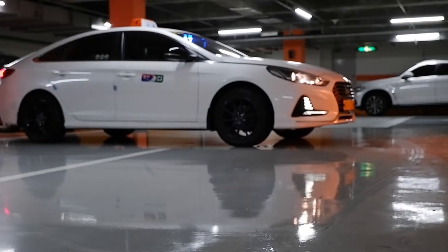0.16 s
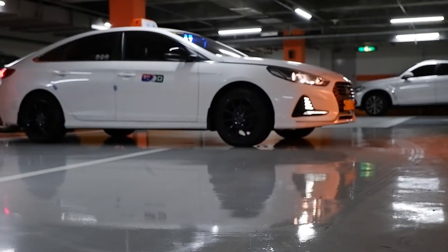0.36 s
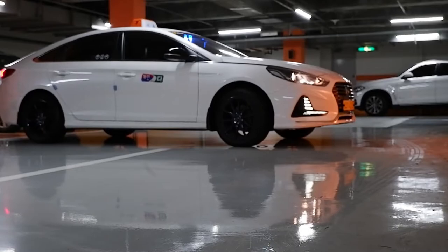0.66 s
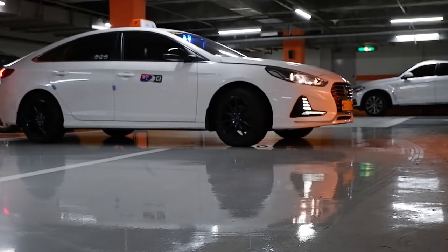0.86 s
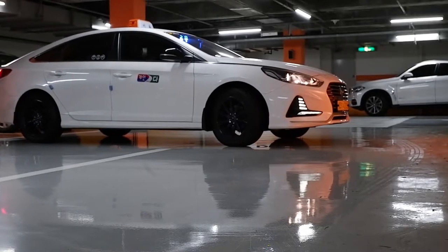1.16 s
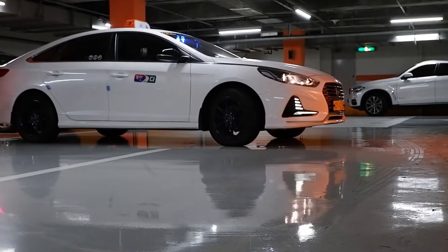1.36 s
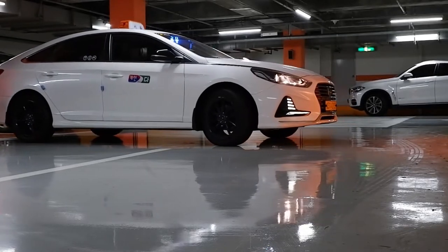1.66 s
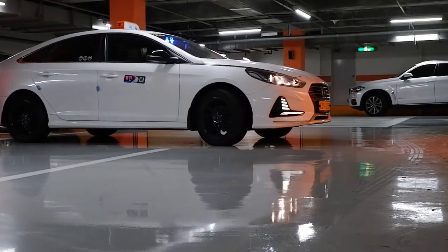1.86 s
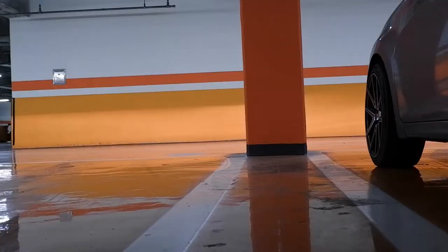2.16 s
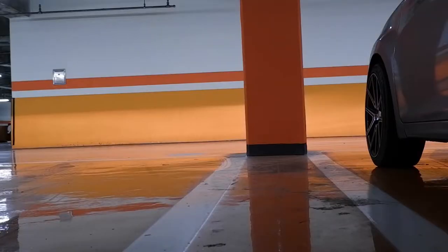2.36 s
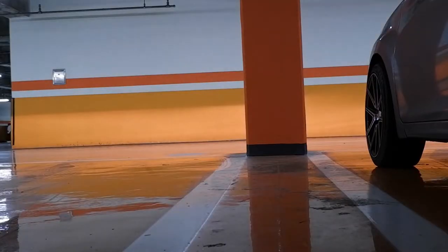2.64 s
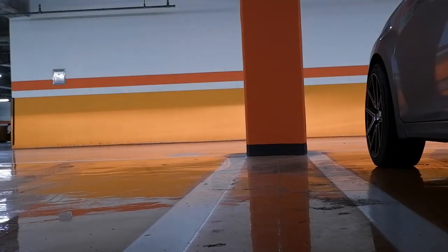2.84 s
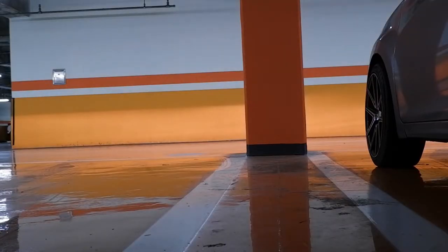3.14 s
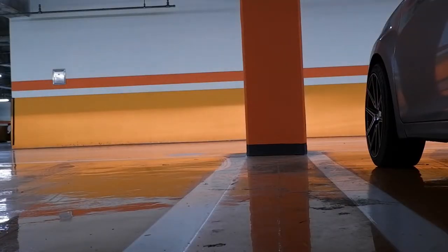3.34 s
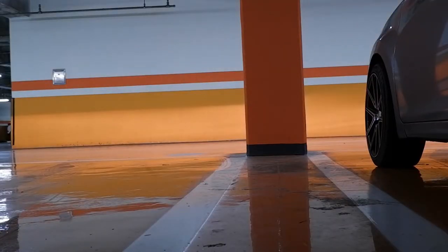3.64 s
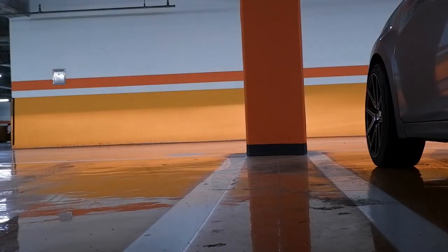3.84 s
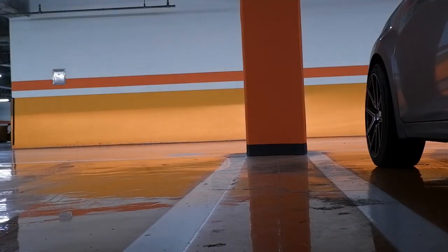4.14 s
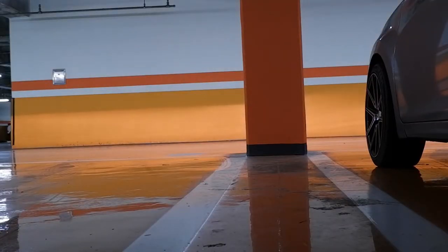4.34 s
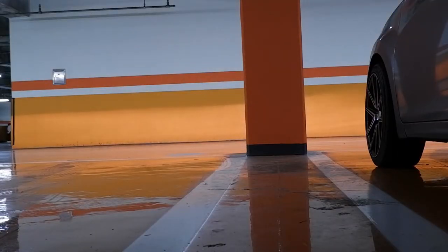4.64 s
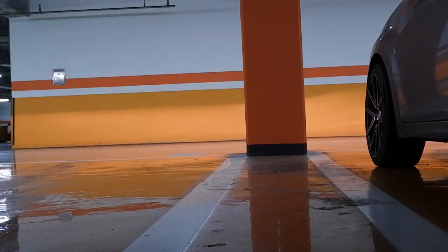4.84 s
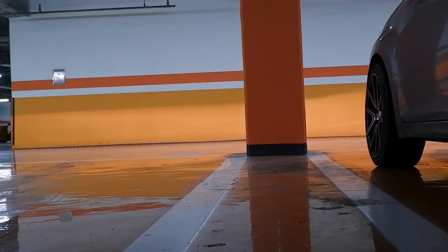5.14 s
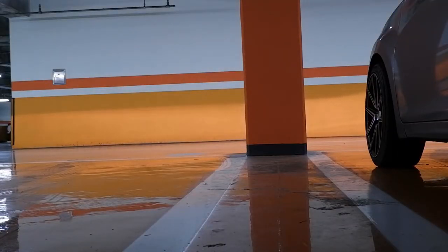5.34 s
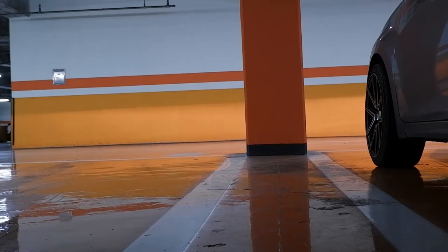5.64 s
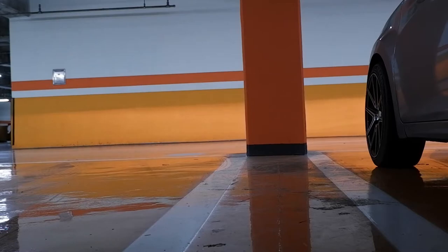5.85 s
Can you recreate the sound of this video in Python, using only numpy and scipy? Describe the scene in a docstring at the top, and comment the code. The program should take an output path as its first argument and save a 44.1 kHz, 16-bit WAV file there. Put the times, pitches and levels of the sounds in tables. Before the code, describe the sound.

An underground garage with hard concrete reverberation, heard in stereo. From 0 s a car rolls by close: steady low four-cylinder drone, fine valve ticking and hiss, and dominant broad tyre roar. Around 0.8 s the driver lifts off; engine pitch drops slightly, hiss dulls and the roar fades, while tiny crisp snaps of tread and grit crackle from 0.9 to 1.3 s. At about 1.98 s it switches abruptly to a second car, quieter and more distant, with a small rev near 2.3 s. Engine and tyre rumble swell, and the exhaust booms unevenly from 3.0 to 3.5 s, strongest near 3.35 s. It then recedes, coasting with a soft blurred gear whine sinking in pitch from 3.6 to 4.6 s. After a lull, throttle pushes near 5.15 and 5.8 s raise the engine note and tyre noise with a brief airy intake hiss. Ventilation sings thinly behind until 6 s.

```python
"""A taxi rolls by in an underground car park: droning, ticking engine, roaring and crackling tyres. It lifts
off and fades, then abruptly a second car in another bay swells with a booming exhaust, coasts with a sinking
gear whine and pulls away, while ventilation sings faintly. Engines are sums of sine waves and bursts of noise
tied to the crank angle; tyres and air are filtered noise; bare concrete adds long reverberation and sound from
all sides."""
import sys
import numpy as np
from scipy import signal
from scipy.fft import rfft, irfft
from scipy.io import wavfile
from scipy.ndimage import uniform_filter1d

SR = 44100
rng = np.random.default_rng(int(sys.argv[2]) if len(sys.argv) > 2 else 0)


def digitize_waveform(pressure):
    """Quantize a signal to 16-bit integers and store it at the path in sys.argv[1].

    Rows of a 2-D input are taken as channels; values are limited to [-1, 1].
    """
    field = np.atleast_2d(pressure).T
    bounded = np.clip(field, -1, 1)
    quanta = np.round(bounded * 32767).astype(np.int16)
    wavfile.write(sys.argv[1], SR, quanta)


N = 264600  # 6 s


def undb(db):
    """Decibels to gain."""
    return 10 ** (np.asarray(db) / 20)


def unit(x):
    """Scale to rms 1."""
    return x / np.sqrt(np.mean(x ** 2))


def seconds():
    """The time of every sample."""
    return np.arange(N) / SR


def curves(table):
    """Join the points of each table column with straight lines, one value per sample."""
    s, *columns = np.transpose(table)
    return [np.interp(seconds(), s, column) for column in columns]


def ramp(start_s, length_s):
    """Rise evenly from 0 to 1, then hold."""
    return np.clip((seconds() - start_s) / length_s, 0, 1)


def swell(peak_s, rise_db_per_s, fall_db_per_s):
    """Gain that grows to 1 at its peak and dies away."""
    since = seconds() - peak_s
    return undb(np.minimum(rise_db_per_s * since, -fall_db_per_s * since))


def bump(peak_s, half_s):
    """Gain that rises smoothly to 1 and falls again."""
    return np.exp(-((seconds() - peak_s) / half_s) ** 2)


def dips(table):
    """Gain that sinks briefly at each (time, depth in dB, half length)."""
    return undb(-sum(db * bump(s, half_s) for s, db, half_s in table))


def follow(lead_db, top_db, ratio):
    """Gain that is top_db when the lead is loudest and falls ratio dB for each dB of the lead."""
    return undb(top_db + ratio * (lead_db - lead_db.max()))


def walk(rate):
    """Smoothed random levels, a new one every 1 / rate s; rms 1 or close to it."""
    hold = int(SR / rate)
    steps = np.repeat(rng.standard_normal(N // hold + 1), hold)
    smooth = uniform_filter1d(uniform_filter1d(steps, hold), hold)
    return unit(smooth[:N])


def bins():
    """Frequencies of the spectrum bins in Hz, at least 1."""
    return np.maximum(np.arange(N // 2 + 1) * SR / N, 1)


def colour(x, points):
    """Filter by a (frequency, dB) outline that drops 60 dB per octave beyond its ends; rms 1."""
    hz, db = np.transpose(points)
    octave, marks = np.log2(bins()), np.log2(hz)
    outside = np.abs(octave - np.clip(octave, marks[0], marks[-1]))
    gain = undb(np.interp(octave, marks, db) - 60 * outside)
    return unit(irfft(rfft(x) * gain, N))


def ring(x, hz, width):
    """One resonance, width in Hz, squared for steeper skirts; rms 1."""
    sharpness = hz / (1.5 * width)
    detuning = bins() / hz - hz / bins()
    return unit(irfft(rfft(x) / (1 + 1j * sharpness * detuning) ** 2, N))


def dulled(x, corner_hz, treble_db):
    """Raise or lower the treble by treble_db, which may change over time."""
    low = irfft(rfft(x) / (1 + (bins() / corner_hz) ** 4), N)
    return low + (x - low) * undb(treble_db)


PORT_GAP_S = 0.00016  # sound's travel time between the two microphone ports


def diffuse():
    """Noise arriving from all sides: the two ports agree in the bass and part in the treble."""
    alike = 0.98 * np.sinc(2 * bins() * PORT_GAP_S) / (1 + (bins() / 2600) ** 2)
    alike = np.clip(alike, -1, 1)
    shares = np.sqrt([1 + alike, 1 - alike])
    mid, side = irfft(rfft(rng.standard_normal((2, N))) * shares, N)
    return unit(np.array([mid + side, mid - side]))


def direct(x, lag_ms):
    """Sound from one direction reaches the left port lag_ms later than the right."""
    half_turns = bins() * lag_ms / 1000 * np.array([[1], [-1]])
    return irfft(rfft(x) * np.exp(-1j * np.pi * half_turns), N)


def echo(x, delay_ms, gain):
    """Add one hard reflection off a pillar, which combs the spectrum; rms 1."""
    reflection = gain * np.exp(-2j * np.pi * bins() * delay_ms / 1000)
    return unit(irfft(rfft(x) * (1 + reflection), N))


HALL_T60_S = 1.13  # time for the reverberation to fade by 60 dB


def hall(x):
    """Long concrete reverberation: noise that fades exponentially, convolved with the sound; rms 1."""
    tail = diffuse() * np.exp(-np.log(1000) * seconds() / HALL_T60_S)
    run_up = np.concatenate([x[:SR][::-1], x])  # the hall is already ringing at the start
    wet = signal.fftconvolve(run_up[None], tail[:, :SR], axes=1)
    return unit(wet[:, SR:SR + N])


def turns(speed_hz):
    """Angle in turns, with a slight random hunting of the speed."""
    return np.cumsum(speed_hz * (1 + .004 * walk(12))) / SR


def puffs(cycles, length, scatter_db):
    """A fading burst of noise in each cycle, each with its own strength; length in cycles."""
    strengths = undb(scatter_db * rng.uniform(-1, 1, 2048))
    size = strengths[cycles.astype(int)]
    return unit(size * np.exp(-(cycles % 1) / length) * rng.standard_normal(N))


def droning(angle, spectrum, near_db):
    """Firing puffs, two a turn, boom through the body: partly direct, mostly by way of the hall."""
    near, far = (puffs(2 * angle, length=0.59, scatter_db=2) for _ in range(2))
    return colour(hall(far) + undb(near_db) * near, spectrum)


def rolling(spectrum, lag_ms, direct_db, flicker_db):
    """Tyre and air noise: a direct part within the hall's diffuse wash, its level flickering."""
    wash = diffuse() + undb(direct_db) * direct(rng.standard_normal(N), lag_ms)
    return colour(wash, spectrum) * undb(flicker_db * walk(22.16))


def ticking(angle, share, lag_ms, length):
    """The engine ticks four times a turn, straight from the car, within its own diffuse wash."""
    share = np.clip(share, 0, 1)  # direct part of the power
    ticks = direct(puffs(4 * angle, length=length, scatter_db=3.5), lag_ms)
    return np.sqrt(share) * ticks + np.sqrt(1 - share) * diffuse()


def hum(angle, orders, waver_db, smear):
    """Sines at multiples of the turning speed, wavering in level and phase (smear in cycles); rms 1.

    The wavering stands for movement through the hall's standing waves.
    """
    total = 0
    for multiple, db in orders:
        level = undb(db + waver_db * walk(6.52))
        cycles = multiple * angle + rng.random() + smear * walk(11)
        total = total + level * np.sin(2 * np.pi * cycles)
    return unit(total)


# The taxi rolling away: t/s, tyre roar level/dB and engine-bay hiss level/dB, both before the treble is changed
TAXI_LEVELS = [(0, -20.5, -35.5), (.8, -21, -36), (1.07, -22.5, -44), (1.21, -24, -42.5),
               (1.47, -25.5, -52.5), (1.82, -28, -50), (1.93, -29, -48)]
LIFT_S, LIFT_LENGTH_S = .83, .22  # the driver lifts off: middle and length of the release
PULLING_HZ, IDLE_HZ = 24.14, 21.58  # crank turns per second, on and off the throttle


def taxi():
    """A four-cylinder engine drones and ticks, then drops to idle as its roaring, crackling tyres fade."""
    roar_db, hiss_db = curves(TAXI_LEVELS)
    away_db = hiss_db - hiss_db.max()
    throttle = 1 - ramp(LIFT_S - LIFT_LENGTH_S / 2, LIFT_LENGTH_S)
    angle = turns(IDLE_HZ + (PULLING_HZ - IDLE_HZ) * throttle)
    engine = taxi_drone(angle, roar_db) + taxi_bay(angle, throttle, hiss_db, away_db)
    engine = engine + taxi_hum(angle, throttle) + engine_surges(angle)
    return engine + taxi_roar(roar_db, away_db) + far_rumble() + crackle()


# Outline of the taxi's drone: f/Hz, relative level/dB
TAXI_DRONE_SPECTRUM = [(65, -58), (110, -28), (124, -20.5), (177, -13.5), (236, 0.5), (280, -3), (332, -2),
                       (367, -14), (420, -16), (550, -24), (920, -120)]


def taxi_drone(angle, roar_db):
    """Firing puffs boom through the body and fade along with the tyre roar."""
    return droning(angle, TAXI_DRONE_SPECTRUM, near_db=-1.5) * follow(roar_db, top_db=-27.0, ratio=1.03)


# Outline of the taxi's tyre roar: f/Hz, relative level/dB
TAXI_ROAR_SPECTRUM = [(210, -10), (350, -0.5), (372, -10), (392, -3.5), (807, 0), (1180, -3.5), (1280, -2),
                      (1940, -7.5), (2450, -12.5), (2720, -13), (2950, -13.5), (3650, -19), (4000, -31),
                      (5200, -38), (8800, -120)]


def taxi_roar(roar_db, away_db):
    """Tyre noise reflects off a pillar and loses treble as the taxi draws away."""
    roar = rolling(TAXI_ROAR_SPECTRUM, lag_ms=0.078, direct_db=-9, flicker_db=0.5)
    roar = echo(roar, delay_ms=6.7, gain=0.043)
    return dulled(roar, corner_hz=1760, treble_db=0.23 * away_db - 1.66) * undb(roar_db)


# Outline of the engine-bay hiss: f/Hz, relative level/dB
TAXI_HISS_SPECTRUM = [(2400, -19), (3000, -10), (3640, -1), (4350, -2), (4850, -5), (6000, -9), (7200, -14),
                      (9000, -16.5), (11500, -21.5), (13500, -25), (14300, -31), (15300, -39)]
# Ringing engine parts: f/Hz, relative level/dB
ENGINE_PARTS = [(995.9, -33.5), (1120, -36), (1378, -36.5), (2116, -42.5), (2202, -46), (2724, -46),
                (3531, -53), (3650, -62), (3838, -58), (4210, -51), (4334, -59), (4484, -60), (4931, -62),
                (5055, -65), (5319, -61)]


def taxi_bay(angle, throttle, hiss_db, away_db):
    """The engine's ticks hiss, ring the engine's parts and sound high injector noise."""
    bay = ticking(angle, share=0.077 + 0.14 * throttle, lag_ms=0.0092, length=0.4)
    hiss = echo(colour(bay, TAXI_HISS_SPECTRUM), delay_ms=7.4, gain=0.089)
    hiss = dulled(hiss, corner_hz=6000, treble_db=0.2 * away_db + 0.5)
    ringing = sum(undb(db - 1.5) * ring(bay, hz, width=23.5) for hz, db in ENGINE_PARTS)
    injectors = ring(bay, hz=8010, width=750)
    injectors = injectors * follow(hiss_db, top_db=-55.0, ratio=1.6)  # fades faster than the hiss
    return hiss * undb(hiss_db) + ringing * undb(away_db) + injectors


# The taxi's hum: multiple of the crank speed, relative level/dB on the throttle, relative level/dB coasting
TAXI_MULTIPLES = [(2, -26, -14), (3, -20, -6), (4, 1, 0.5), (5, -21, 0), (7, -5, -2.5), (8, 3, 3.5)]
# The hum drops out briefly: t/s, depth/dB, half length/s
HUM_DROPOUTS = [(.125, 12, 0.024), (.665, 16, 0.044), (.98, 9, .04), (1.13, 11, 0.035)]


def taxi_hum(angle, throttle):
    """Multiples of the crank speed change balance as the driver lifts off."""
    on_throttle = [(multiple, db) for multiple, db, _ in TAXI_MULTIPLES]
    off_throttle = [(multiple, db) for multiple, _, db in TAXI_MULTIPLES]
    pulling = undb(-38.5) * hum(angle, on_throttle, waver_db=1.5, smear=0.09)
    coasting = undb(-43.5) * hum(angle, off_throttle, waver_db=3.0, smear=0.14)
    tone = np.sqrt(throttle) * pulling + np.sqrt(1 - throttle) * coasting
    return tone * dips(HUM_DROPOUTS)


# Outline of the garage's rumble behind the taxi: f/Hz, relative level/dB
FAR_RUMBLE_SPECTRUM = [(25, -14), (45, -15), (70, -8), (110, 2), (160, 1)]


def far_rumble():
    """The garage rumbles faintly and steadily from all sides."""
    return undb(-53.5) * colour(diffuse(), FAR_RUMBLE_SPECTRUM)


# Brief surges of the engine's higher orders: peak t/s, pitch as a multiple of the crank speed, level/dB
ENGINE_SURGES = [(.14, 14, -29.5), (.27, 10, -27), (.43, 10, -29), (.57, 14, -27.5), (.68, 10, -27),
                 (.8, 12, -27.5), (.95, 13, -32), (1.1, 12, -32), (1.22, 15, -34), (1.4, 12, -31.5)]


def engine_surges(angle):
    """Higher multiples of the crank speed surge briefly, one after another."""
    total = 0
    for s, multiple, db in ENGINE_SURGES:
        tone = hum(angle, [(multiple, 0)], waver_db=0.0, smear=0.048)
        total = total + undb(db) * bump(s, half_s=0.051) * tone
    return total


# Grit snapping under a tyre: t/s, peak level/dB before grit_db and the band filters
GRIT_SNAPS = [(0.8944, -23), (0.9824, -31), (0.993, -25.5), (1.02, -24), (1.0575, -26), (1.0757, -32),
              (1.0957, -32), (1.1071, -34), (1.1578, -29), (1.181, -33), (1.2199, -32.5), (1.261, -36),
              (1.2967, -37)]
PEEL_S, PEEL_DB = 0.98, -37.5  # tread peeling off the paint: peak time, mean snap before the band filters


def crackle(snap_hz=10800, snap_width_hz=4600, grit_db=-7, snap_s=0.0004):
    """Tread blocks let go of the glossy paint with tiny snaps; a few grains of grit crack louder."""
    peel = undb(PEEL_DB) * swell(PEEL_S, rise_db_per_s=14, fall_db_per_s=68)
    chosen = rng.random(N) < 220 / SR  # about 220 snaps a second
    snaps = chosen * rng.rayleigh(.8, size=N) * peel
    for s, db in GRIT_SNAPS:
        snaps[int(s * SR)] += undb(db + grit_db)
    fading = signal.lfilter([1], [1, -np.exp(-1 / (snap_s * SR))], snaps)
    bursts = fading * rng.standard_normal(N)
    band = signal.iirpeak(snap_hz, snap_hz / snap_width_hz, fs=SR)
    crisp = signal.lfilter(*band, signal.lfilter(*band, bursts))
    return direct(crisp, lag_ms=0.013)


# The second car near, away and near again: t/s, tyre roar level/dB, ticking hiss level/dB before the treble
# change
CAR_LEVELS = [(2, -41.5, -55.5), (2.3, -38, -53.5), (2.65, -35, -50), (3.03, -29.5, -46), (3.3, -30, -47),
              (3.9, -34, -51.5), (4.3, -39, -55.5), (4.65, -41, -56.5), (5.05, -37, -52.5), (6, -35.5, -50)]
# Low drone and tyre rumble building up in the hall: t/s, level/dB that the low layers follow
CAR_BASS = [(2, -39.5), (2.45, -37.5), (2.7, -31.5), (3.05, -29.5), (3.25, -27.5), (3.48, -27.5),
            (3.62, -30.5), (3.9, -31.5), (4.3, -34.5), (4.62, -38.5), (4.9, -38.5), (5.2, -36.5),
            (5.8, -34.5), (6, -37.5)]
# Crank speed before its slight hunting: t/s, f/Hz (turns per second)
CAR_SPEED = [(2, 34.4), (2.35, 30.8), (2.47, 20.2), (2.72, 24.8), (2.9, 34), (3.05, 36), (3.25, 33.5),
             (3.45, 30.8), (3.6, 30), (3.88, 25.5), (4.08, 19.5), (4.28, 27), (4.8, 27.5), (5.1, 32.3),
             (5.35, 36.1), (5.8, 37), (6, 36)]
LOAD_S, LOAD_ATTACK_S = 5.26, 0.15  # it pulls away and stays under load: start, length of the onset


def second_car():
    """The engine revs, coasts and picks up; drone and tyre noise rise and fall as the car nears and leaves."""
    roar_db, hiss_db = curves(CAR_LEVELS)
    bass_db, = curves(CAR_BASS)
    speed_hz, = curves(CAR_SPEED)
    angle = turns(speed_hz)
    engine = car_drone(angle, bass_db) + exhaust(angle) + car_hiss(angle, hiss_db) + intake()
    tyres = car_rumble(bass_db) + car_roar(roar_db)
    return engine + tyres + bay_boom(bass_db) + bay_rings(roar_db) + gear_whine()


# Outline of the second car's drone: f/Hz, relative level/dB
CAR_DRONE_SPECTRUM = [(47, -28), (80, -9), (112, -3.5), (150, -2.5), (188, 1.5), (238, 2), (300, 2),
                      (361, -10.5), (420, -7.5), (550, -35), (920, -120)]


def car_drone(angle, bass_db):
    """Firing puffs boom through the body and the hall."""
    return droning(angle, CAR_DRONE_SPECTRUM, near_db=-4.5) * follow(bass_db, top_db=-29.0, ratio=0.99)


# Outline of the low tyre rumble: f/Hz, relative level/dB
CAR_RUMBLE_SPECTRUM = [(200, -13.5), (340, -5), (366, -6.5), (430, -3.5), (565, -1), (744, -6),
                       (864, -16.5), (950, -13), (1240, -15), (2090, -120)]


def car_rumble(bass_db):
    """Low tyre noise builds up in the hall with a flickering level."""
    rumble = rolling(CAR_RUMBLE_SPECTRUM, lag_ms=-0.099, direct_db=-8, flicker_db=1.23)
    return rumble * follow(bass_db, top_db=-27.5, ratio=1.104)


# Outline of the second car's tyre roar: f/Hz, relative level/dB
CAR_ROAR_SPECTRUM = [(460, -43), (780, -2.5), (906, -7), (1080, -6.5), (1142, -3), (1200, -7.5),
                     (1320, -3.5), (1460, -4), (1560, -2), (1670, -2.5), (2130, -7), (2210, -7.5),
                     (2570, -10.5), (3400, -11), (3700, -17.5), (4810, -57), (8140, -120)]


def car_roar(roar_db):
    """Higher tyre noise arrives directly, from all sides and off a pillar."""
    roar = rolling(CAR_ROAR_SPECTRUM, lag_ms=-.11, direct_db=0.5, flicker_db=0.0)
    return echo(roar, delay_ms=7.0, gain=0.11) * undb(roar_db)


# Outline of the engine's ticking hiss: f/Hz, relative level/dB
CAR_HISS_SPECTRUM = [(2290, -29), (3900, 1), (4010, 0.5), (4380, 0), (4860, -3.5), (7190, -10.5),
                     (7790, -13), (10200, -17), (14200, -27), (14900, -32), (15500, -36)]


def car_hiss(angle, hiss_db):
    """The engine's ticks hiss, brighter when the car is near."""
    hiss = colour(ticking(angle, share=0.15, lag_ms=-0.12, length=0.55), CAR_HISS_SPECTRUM)
    treble_db = 0.26 * (hiss_db - hiss_db.max()) + 1.7
    return dulled(hiss, corner_hz=8500, treble_db=treble_db) * undb(hiss_db)


def bay_boom(bass_db):
    """The second bay's lowest resonance, kept ringing by the engine, halves as the car pulls away."""
    easing = 1 - 0.49 * ramp(LOAD_S, LOAD_ATTACK_S)
    return ring(diffuse(), hz=66.0, width=22) * follow(bass_db, top_db=-42.5, ratio=0.27) * easing


# Narrow resonances of the second bay: f/Hz, relative level/dB
BAY_RESONANCES = [(1142, -49.5), (1432, -50.5), (1582, -45), (1662, -44.5), (1997, -49), (2272, -50.5)]


def bay_rings(roar_db):
    """Noise rings narrow resonances that follow the car's roar and grow louder as it pulls away."""
    air = diffuse()
    lift = undb(2.1 * ramp(LOAD_S - .2, LOAD_ATTACK_S))
    drive = follow(roar_db, top_db=-1.5, ratio=0.61) * lift
    return sum(undb(db) * ring(air, hz, width=15.3) for hz, db in BAY_RESONANCES) * drive


# Uneven throbs of the exhaust: peak t/s, relative level/dB, half length/s
EXHAUST_THROBS = [(2.078, -40, 0.036), (2.19, -45, .03), (2.316, -38.5, .06), (2.51, -43, 0.055),
                  (2.78, -37, .04), (2.9, -32, 0.073), (3.11, -25.5, .1), (3.22, -27.5, .04),
                  (3.361, -22, 0.045), (3.455, -27, .027), (3.61, -32, .034), (3.72, -35, .028),
                  (3.82, -39, .025), (3.92, -40, 0.054), (4.03, -38, .05), (4.29, -39, .035),
                  (4.8, -43, 0.081), (4.98, -39.5, .07), (5.117, -35.5, 0.074), (5.33, -40.5, .03)]
# Overtones of the exhaust: multiple of the crank speed, relative level/dB
CAR_OVERTONES = [(4, -2.5), (5, -7.5), (6, -1), (7, -4.5), (8, -2), (9, -2), (10, -3)]
# Silencer resonances: f/Hz, width/Hz, relative level/dB
SILENCER_RESONANCES = [(198.3, 42, 0), (247, 42, -5), (302, 44, -4.5)]
# Pushes on the throttle, also used by intake(): peak t/s, then the relative levels
# overtone level/dB, silencer level/dB, intake whistle level/dB
THROTTLE_PUSHES = [(2.3, -42, -42.5, -44.5), (3.33, -29.5, -36, -68), (4.28, -47.5, -40, -76.5),
                   (5.15, -42, -38, -47), (5.82, -41, -40, -63)]


def exhaust(angle):
    """The firing note throbs; pushes swell overtones and ring the silencer; unequal cylinders show under load."""
    firing = hum(angle, [(2, 0)], waver_db=1.0, smear=.035)
    firing = firing + undb(-14) * ring(diffuse(), hz=105, width=81)
    boom = firing * sum(undb(db) * bump(s, half_s) for s, db, half_s in EXHAUST_THROBS)
    surge = sum(undb(db) * swell(s, rise_db_per_s=23.5, fall_db_per_s=20) for s, db, _, _ in THROTTLE_PUSHES)
    overtones = hum(angle, CAR_OVERTONES, waver_db=2.5, smear=.16) * surge
    load = undb(-40) * ramp(LOAD_S, LOAD_ATTACK_S) + undb(-24) * surge
    uneven = hum(angle, [(1, -7), (3, 0)], waver_db=.8, smear=.02) * load
    drive = sum(undb(db) * swell(s, rise_db_per_s=43, fall_db_per_s=16.5) for s, _, db, _ in THROTTLE_PUSHES)
    gas = hall(puffs(2 * angle, length=0.22, scatter_db=2))
    silencer = sum(undb(db) * ring(gas, hz, width) for hz, width, db in SILENCER_RESONANCES)
    return boom + overtones + uneven + silencer * drive


def intake():
    """At each push, air rushing past the throttle rings two resonances of the intake duct."""
    air = diffuse()
    flow = sum(undb(db) * swell(s, rise_db_per_s=26, fall_db_per_s=15) for s, _, _, db in THROTTLE_PUSHES)
    whistle = ring(air, hz=3360, width=330) + undb(-8.5) * ring(air, hz=4260, width=360)
    return whistle * flow


# Ventilation duct resonances in the second bay: f/Hz, width/Hz, level/dB
DUCT_RESONANCES = [(3460, 500, -54.5), (4230, 400, -62.5)]
FAN_HZ, FAN_DB = 1668, -53  # the fan's thin blade tone


def vents():
    """Duct resonances sing faintly on the moving air, around the fan's slightly wavering tone."""
    air = diffuse()
    ducts = sum(undb(db) * ring(air, hz, width) for hz, width, db in DUCT_RESONANCES)
    fan = np.array([hum(turns(FAN_HZ), [(1, 0)], waver_db=3.0, smear=.1) for _ in range(2)])
    return ducts + undb(FAN_DB) * fan


# Gear whine sinking as the car slows off the throttle: t/s, centre f/Hz, level/dB before random patchiness
GEAR_GLIDE = [(3.5, 620, -62), (3.68, 596.5, -42), (3.82, 544.7, -36), (3.95, 500.4, -36.5),
              (4.15, 469.5, -39.5), (4.38, 444, -42.5), (4.9, 419, -56), (5.3, 420, -90)]


def gear_whine(width_hz=60, patchy_db=2.0):
    """The tone of meshing teeth, smeared by the hall into a narrow band that sinks with the road speed."""
    hz, db = curves(GEAR_GLIDE)
    mesh = 2 * np.pi * np.cumsum(hz) / SR
    low_pass = signal.butter(2, width_hz / 2, fs=SR, output="sos")
    a, b = (signal.sosfilt(low_pass, diffuse()) for _ in range(2))
    band = unit(a * np.cos(mesh) + b * np.sin(mesh))  # slow noise moved up to the gliding pitch
    return band * undb(db + patchy_db * walk(18))


CHANGE_S = 1.975  # the second car takes over from the taxi


def scene():
    """The taxi first, then the second car in its own bay, with a 10 ms crossfade."""
    later = ramp(CHANGE_S - .005, .01)
    return np.sqrt(1 - later) * taxi() + np.sqrt(later) * (second_car() + vents())


NOTCH_HZ, NOTCH_WIDTH_HZ, NOTCH_DEPTH = 3960, 220, 0.6  # depth: share of the band taken away
TOP_HZ = 15300


def record(dry):
    """The microphone housing cuts a notch; deepest bass and highest treble go, and both ends are eased."""
    housing = signal.lfilter(*signal.iirpeak(NOTCH_HZ, NOTCH_HZ / NOTCH_WIDTH_HZ, fs=SR), dry)
    high_pass = signal.butter(4, 32, "high", fs=SR, output="sos")
    thin = signal.sosfilt(high_pass, dry - NOTCH_DEPTH * housing)
    edge = ramp(0, .003)
    eased = thin * edge * edge[::-1]
    return signal.sosfilt(signal.ellip(8, .2, 70, TOP_HZ, fs=SR, output="sos"), eased)


dry = scene()
out = record(dry)
digitize_waveform(out)
```